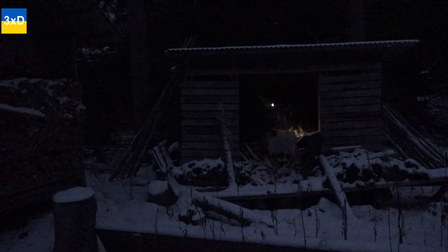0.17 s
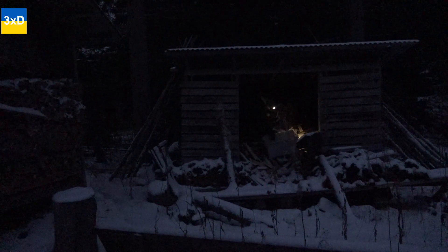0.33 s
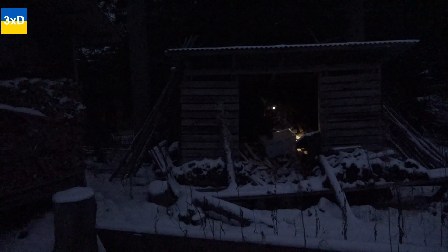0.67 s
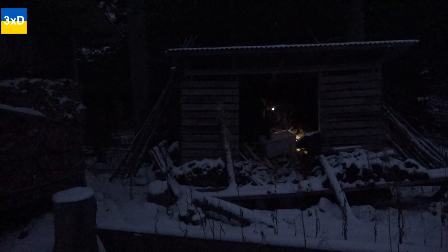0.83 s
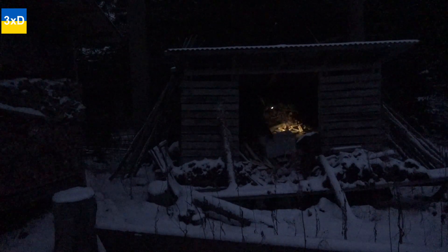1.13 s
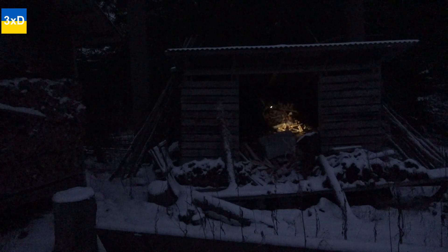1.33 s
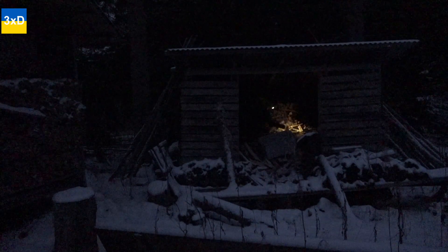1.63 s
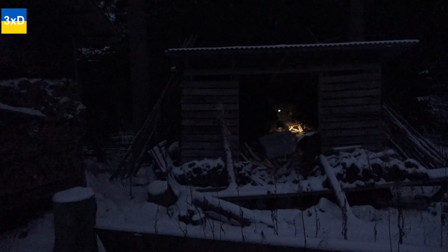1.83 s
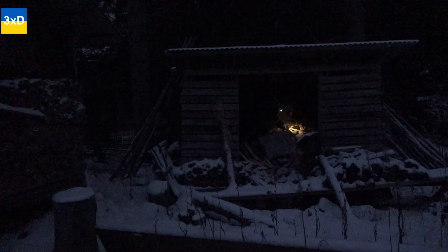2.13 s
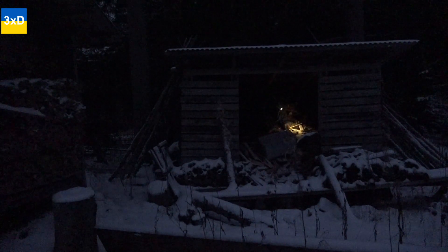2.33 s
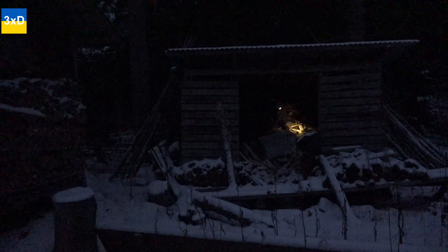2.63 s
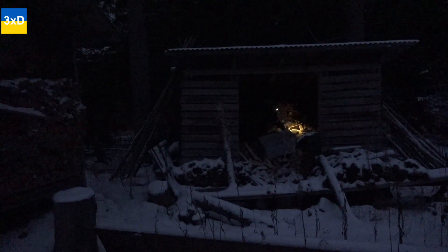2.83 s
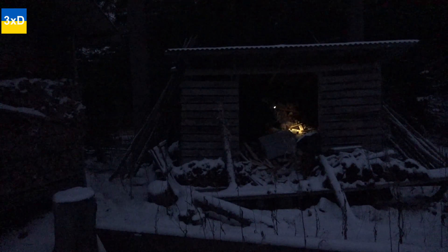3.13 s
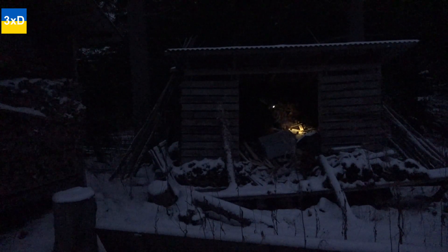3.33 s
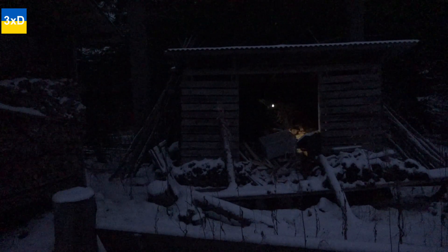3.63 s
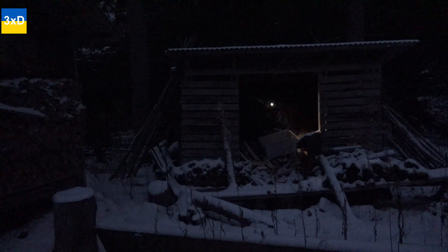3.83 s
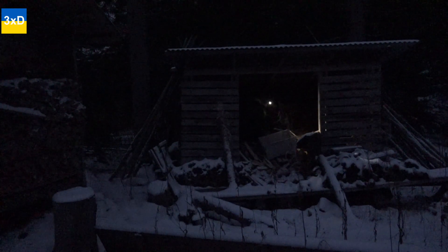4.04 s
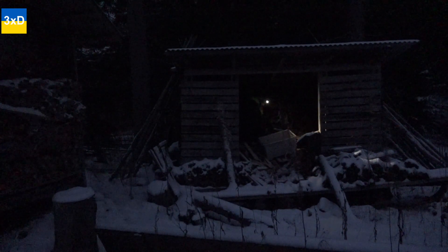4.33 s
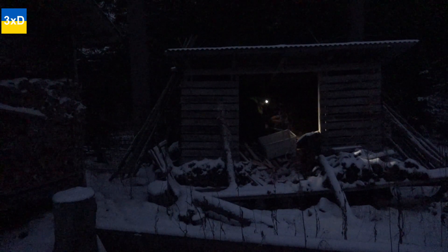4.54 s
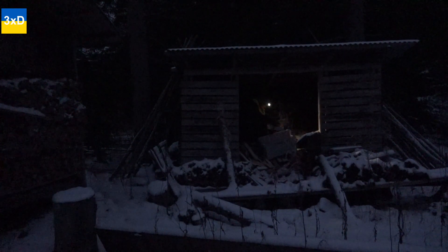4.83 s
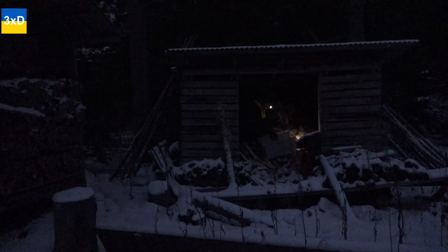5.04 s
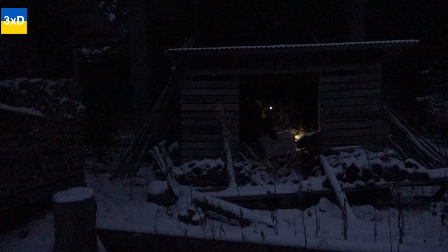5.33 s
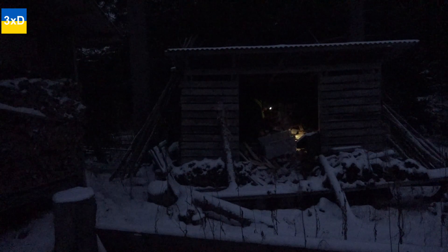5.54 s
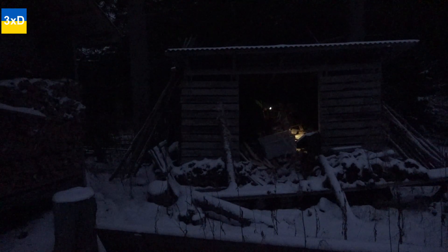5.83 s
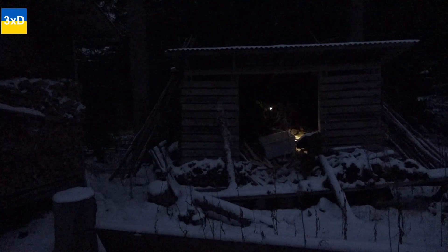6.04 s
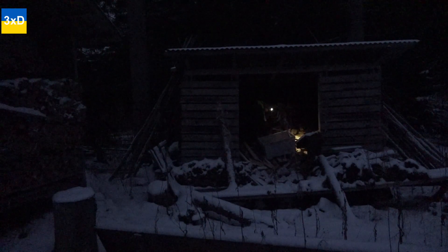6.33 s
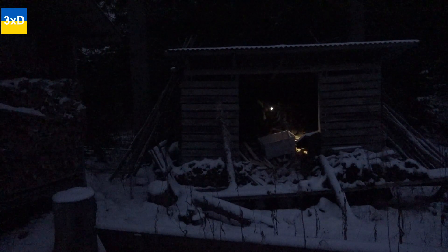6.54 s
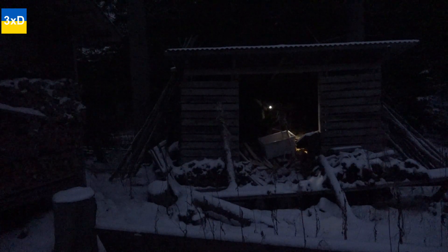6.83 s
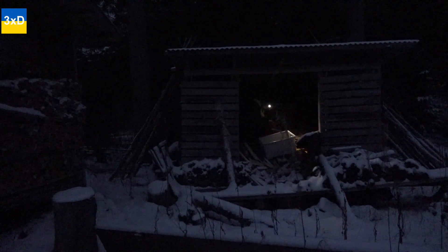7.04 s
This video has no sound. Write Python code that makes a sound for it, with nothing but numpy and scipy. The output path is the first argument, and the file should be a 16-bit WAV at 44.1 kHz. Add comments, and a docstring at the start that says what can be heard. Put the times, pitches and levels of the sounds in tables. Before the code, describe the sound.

Woody knocks tumble in two quick bursts, pause, then one solid knock starts a stretch of rough rubbing, clacking and crackling from a log pile. Two tiny squeaks precede the loudest blow, a hard crashing tumble that slightly overloads the microphone. Quieter shuffling, ticks and a last faint squeak end it. Outdoor shed, short wooden reflections, low air noise, little wind.

```python
"""In an open woodshed on a quiet night, split logs are pulled from a pile, dropped into a barrow and stacked.
Each knock is a sum of damped modes of the log, with bands of noise from pile and boards and a contact crack.
Bark ticks are short noise bursts; drags are grainy noise with small taps; squeaks are rough gliding tones.
Still air is coloured noise. Loud blows turn the gain down, and the loudest peaks are clipped."""
import sys
import numpy as np
from scipy import signal
from scipy.fft import rfft, irfft, next_fast_len
from scipy.io import wavfile
from scipy.ndimage import uniform_filter1d, map_coordinates

SR = 44100
rng = np.random.default_rng(int(sys.argv[2]) if len(sys.argv) > 2 else 0)


def inscribe(sig):
    """Save sig as 16-bit PCM at rate SR to the path in sys.argv[1].

    A 1-D sig is mono; a 2-D sig holds one channel per row.
    Samples are clipped to [-1, 1] before scaling.
    """
    pcm = np.round(np.clip(np.atleast_2d(sig).T, -1, 1) * 32767)
    wavfile.write(sys.argv[1], SR, pcm.astype(np.int16))


N = 316638

# Spectrum of snapping bark. Each row: frequency in Hz, relative level in dB per Hz.
SNAP_SPECTRUM = [(1200, -7.5), (3500, -3), (6000, -6), (11000, -13.5), (16000, -21)]
BODY_GROWS = 0.22  # dB of pile noise, boom and overtones per dB of hardness: a soft contact leaves a purer note


def amp(db):
    """Level: twenty decibels are a factor of ten in amplitude."""
    return 10 ** (np.asarray(db) / 20)


def unit(x):
    """Normalisation: mean power is brought to one, so that rms is 1."""
    return x / np.sqrt(np.mean(x ** 2) + 1e-20)


def along(points, hz):
    """Spectral envelope: straight lines between (Hz, value) points on a logarithmic frequency axis."""
    f, v = np.transpose(points)
    return np.interp(np.log(hz + 1), np.log(f + 1), v)


def filtered(x, response):
    """Linear filtering: the spectrum is multiplied by a response, given as a function of frequency."""
    m = next_fast_len(x.shape[-1] + 8192)
    spectrum = rfft(x, m) * response(np.fft.rfftfreq(m, 1 / SR))
    return irfft(spectrum, m)[..., :x.shape[-1]]


def hiss(spectrum, size=N):
    """Coloured noise: white noise filtered to a spectral envelope, at rms 1."""
    white = rng.standard_normal(size)
    return unit(filtered(white, lambda hz: amp(along(spectrum, hz))))


def wobble(rate):
    """Slow modulation: a smooth curve through random knots, rate knots a second."""
    knots = rng.standard_normal(int(N * rate / SR) + 4)
    return map_coordinates(knots, [np.arange(N) * rate / SR])


def fade(t, t60, attack):
    """Damping: a quick rise, then exponential decay by 60 dB in t60 seconds."""
    return (1 - np.exp(-t / attack)) * amp(-60 * t / t60)


def swell(s, length):
    """Stroke envelope: the level rises and falls once between s and s + length."""
    return np.sin(np.pi * np.clip((np.arange(N) / SR - s) / length, 0, 1)) ** .5


def bump(hz, centre_hz, octaves):
    """Broad resonance: a Gaussian bell on a logarithmic frequency axis."""
    return np.exp(-.5 * (np.log2(hz / centre_hz) / octaves) ** 2)


def shaped(noise, envelope):
    """Energy conservation: noise under an envelope is scaled to the envelope's own energy."""
    x = noise * envelope
    return x * np.linalg.norm(envelope) / np.linalg.norm(x)


def air():
    """Background noise: still air and microphone hiss are broadband; light wind stirs the deepest bass."""
    # Each row: frequency in Hz, relative level in dB per Hz.
    air_spectrum = [(20, 0.5), (120, -3), (680, -6), (1000, -11.5), (3000, -18.5), (16000, -29.5)]
    wind = amp(-66.0 + 3.3 * wobble(26)) * hiss([(30, -27), (90, -12.0), (200, -38.5)])
    still = amp(-53.5 + 0.37 * wobble(9.7)) * hiss(air_spectrum)
    return still + wind


def squeaks():
    """Frequency modulation: brief faint squeaks are tones whose pitch slides and jitters."""
    # Each row: start in seconds, length in seconds, first pitch in Hz, last pitch in Hz, mean level in dB.
    squeak_table = [(4.477, 0.067, 2620, 2700, -49.5), (4.571, 0.048, 2450, 3250, -51.5),
                    (7.062, 0.17, 1730, 1740, -51)]
    t, out = np.arange(N) / SR, 0
    for s, length, from_hz, to_hz, db in squeak_table:
        glide = np.interp(t, [s, s + length], [from_hz, to_hz])
        hz = glide * (1 + 0.063 * wobble(400))
        tone = np.sin(2 * np.pi * np.cumsum(hz) / SR)
        out = out + amp(db + 2.6 * wobble(150)) * swell(s, length) * tone
    return out


def grit(rate, t60, spread_db):
    """Shot-noise envelope: many small random contacts, rate a second, a few larger than the rest."""
    sizes = amp(spread_db * np.minimum(rng.exponential(1, N), 3))
    hits = (rng.random(N) < rate / SR) * sizes
    decays = signal.fftconvolve(hits, fade(np.arange(4096) / SR, t60, 0.0016))[:N]
    return unit(decays + .5)  # the constant keeps some sound between contacts


def patchy(x, patchy_db):
    """Many rubbing contacts: short blotches of random gain in time and pitch."""
    z = signal.stft(x, nperseg=256)[2]
    field = uniform_filter1d(rng.standard_normal(z.shape), size=7, axis=0)  # smooth in pitch
    field = uniform_filter1d(field, size=5, axis=1)  # smooth in time
    return unit(signal.istft(z * amp(patchy_db * unit(field)), nperseg=256)[1][:N])


def chips():
    """Small-body resonance: wood pieces tap, each a note damped by 60 dB in 25 cycles at its own pitch."""
    taps_per_s, middle_hz = 40, 1540
    draw = rng.random((round(taps_per_s * N / SR), 3))
    t = np.arange(SR // 25) / SR
    hz = middle_hz * 2 ** (2.4 * (draw[:, 1:2] - .5))
    size = amp(-5 * np.log(draw[:, 2:] + 0.042))  # a few taps much larger than the rest
    notes = size * fade(t, 25 / hz, 0.00044) * np.sin(2 * np.pi * hz * t)
    at = (draw[:, :1] * N).astype(int) + np.arange(len(t))
    return unit(np.bincount(at.ravel(), notes.ravel())[:N])


def shifting():
    """Sliding friction: dragged logs rumble, scrape, tap and crackle; rolling logs only rumble."""
    # Logs dragged over each other. Each row: start in seconds, length in seconds, scrape level in dB.
    drag_table = [(1.213, 0.087, -55), (1.484, 0.39, -57), (1.854, 0.2, -45.5), (2.04, 0.17, -47.5),
                  (2.6, 0.23, -50.5), (2.813, 0.47, -46), (3.06, 0.14, -49), (3.29, 0.3, -45.5),
                  (3.54, 0.17, -49), (3.656, 0.15, -48.5), (3.925, 0.11, -48.5), (4.023, 0.14, -46),
                  (4.164, 0.11, -44.5), (4.275, 0.35, -51), (4.647, 0.26, -57.5), (4.924, 0.13, -48.5),
                  (5.94, 0.18, -51), (6.098, 0.18, -49.5), (6.556, 0.16, -53.5), (7.042, 0.12, -56)]
    # Logs rolling in the barrow. Each row: start in seconds, length in seconds, rumble level in dB.
    roll_table = [(5.328, 0.45, -50.5)]
    # Lumpy rumble. Each row: frequency in Hz, relative level in dB per Hz.
    rumble_spectrum = [(50, -21.5), (150, 2.5), (500, 13), (1500, -9), (3000, -43)]
    # Bark scrape. Each row: frequency in Hz, relative level in dB per Hz.
    scrape_spectrum = [(600, -9.5), (1600, 1), (5000, -15.5), (16000, -22.5)]
    rumble_db, chip_db, crackle_db = -1.15, -8, -6.5  # against the scrape

    drag = sum(amp(db) * swell(s, length) for s, length, db in drag_table)
    roll = sum(amp(db) * swell(s, length) for s, length, db in roll_table)
    rumble = grit(77, 0.031, spread_db=2.5) * patchy(hiss(rumble_spectrum), patchy_db=2.0)
    scrape = grit(160, 0.0084, spread_db=5.5) * patchy(hiss(scrape_spectrum), patchy_db=2.5)
    taps = np.pad(chips(), (0, N))[:N]
    crackle = grit(70, 0.012, spread_db=5.0) * patchy(hiss(SNAP_SPECTRUM), patchy_db=5.5)
    dragged = scrape + amp(chip_db) * taps + amp(crackle_db) * crackle
    return (amp(rumble_db) * drag + roll) * rumble + drag * dragged


def ticks():
    """Brittle fracture: bark and splinters snap in a click of a few ms, with a weaker wash in the shed."""
    # Each row: time in seconds, level in dB.
    tick_table = [(0.258, -31), (0.408, -40.5), (1.006, -38), (2, -40.5), (2.152, -36), (2.842, -35),
                  (3.146, -33.5), (3.164, -33), (3.306, -32), (3.342, -37.5), (3.611, -34.5), (3.6533, -30),
                  (3.805, -35.5), (3.9156, -38.5), (3.949, -34), (4.113, -37), (4.2319, -20), (4.677, -43),
                  (5.034, -20.5), (5.443, -43.5), (6.1149, -30), (6.305, -40), (6.4523, -41), (6.5154, -38)]
    envelope, t = np.zeros(N + SR), np.arange(SR // 4) / SR
    click = fade(t, .016, .0002)
    wash = amp(-9.5) * fade(t, 0.14, 0.0028)
    for s, db in tick_table:
        envelope[round(s * SR) - 30:][:len(t)] += amp(db) * (click + wash)
    return envelope[:N] * hiss(SNAP_SPECTRUM)


def log_ring(t, hz, hard_db, t60):
    """Modal vibration: a struck log sounds its pitch and inharmonic overtones, echoed by near walls."""
    # Higher modes of a split log. Each row: mean ratio to the pitch, mean level in dB at hardness 0.
    overtone_table = [(1.598, -9.5), (2.599, -13.5), (3.9, -17.5)]
    ring = fade(t, 0.44 * t60, 0.00045) * np.sin(2 * np.pi * hz * t)
    for times, mode_db in overtone_table:
        mode_hz = hz * times * (1 + 0.12 * rng.normal())
        gain = amp(mode_db + BODY_GROWS * hard_db + rng.normal(0, 2.4))
        decay = fade(t, 0.82 * t60 / times, 0.00065)
        ring = ring + gain * decay * np.sin(2 * np.pi * mode_hz * t)
    walls = np.zeros(1024)  # near shed walls answer within 23 ms
    walls[rng.integers(40, 1024, size=6)] = rng.normal(0, 0.14, size=6)
    walls[0] = 1
    return signal.fftconvolve(ring, walls)[:len(t)]


def shaken_wood(t, chatter, hz, hard_db, t60, boom_db, clack_db):
    """Forced vibration: a blow shakes pile and boards in broad bands round the pitch, the boom and the clack."""
    foot_hz = 750  # logs that ring above this also shake a narrower band
    clack_grows, clack_fades_db = 0.64, 12.5  # dB per dB of hardness; dB lost per octave above the foot
    clack_db += clack_grows * hard_db - clack_fades_db * max(np.log2(hz / foot_hz), 0)
    knots = np.geomspace(60, 6000, 90)
    lumps = np.transpose([knots, rng.normal(0, 5.5, len(knots))])  # each blow has its own peaks and dips

    def band(centre_hz, octaves):
        """Resonant band: noise under a bell with this blow's peaks and dips."""
        white = rng.standard_normal(len(t))
        return unit(filtered(white, lambda f: bump(f + 1, centre_hz, octaves) * amp(along(lumps, f))))

    body = shaped(chatter * band(hz, 0.69 * min(foot_hz / hz, 1)), fade(t, 1.08 * t60, 0.0013))
    boom = shaped(chatter * band(219, 0.99), fade(t, 1.9 * t60, 0.0054))
    clack = shaped(chatter * band(1303, 0.78), fade(t, 1.12 * t60, 0.0012))
    grown_db = BODY_GROWS * hard_db
    return amp(-7.5 + grown_db) * body + amp(boom_db + grown_db) * boom + amp(clack_db) * clack


def contact_crack(t, t60):
    """Impact noise: the brief contact excites a bright band, with a weaker tail."""
    # Each row: frequency in Hz, relative level in dB per Hz.
    crack_spectrum = [(2000, -5), (3500, 0), (9000, -9), (16000, -23)]
    envelope = fade(t, 0.016, 0.0001) + amp(-5.0) * fade(t, 1.33 * t60, 0.00074)
    return hiss(crack_spectrum, size=len(t)) * envelope


def knocks():
    """Impact excitation: each blow rings a log, shakes the wood round it and cracks at the contact."""
    # Each row: time in seconds, level in dB, log pitch in Hz, contact hardness in dB,
    # nominal 60 dB decay time in seconds, from which each part takes its own.
    drop_table = [(0.144, -14.5, 628, -0.5, 0.22), (0.154, -5, 456.4, -2, 0.24),
                  (0.1543, -20.5, 3270, -10, 0.056), (0.195, -15, 504, 3, 0.28),
                  (0.211, -10.5, 400, -2.5, 0.19), (0.277, -7.5, 690, -0.5, 0.09),
                  (0.316, -21.5, 420, 2, 0.28), (0.607, -25, 399, -4, 0.17), (0.7, -23, 856, -34, 0.26),
                  (0.714, -24, 887, 11.5, 0.17), (0.773, -12, 379, -2, 0.17), (0.87, -25, 540, 5, 0.045),
                  (0.876, -11, 532, 8.5, 0.16), (0.921, -7, 324, -8, 0.067), (0.947, -16.5, 470, -19, 0.28),
                  (0.971, -17, 453, 2.5, 0.22), (1.004, -18.5, 321, -23, 0.27), (1.064, -22, 412, 0, 0.03),
                  (4.997, -24, 660, 5, 0.04), (5.016, -3.5, 380, 1.5, 0.49), (5.051, 13.5, 558, 9, 0.051),
                  (5.061, 6, 494, 5.5, 0.11), (5.133, -5.5, 602, -16, 0.07), (5.153, -2, 306, 8.5, 0.095),
                  (5.197, -15, 559, 1, 0.45), (5.274, -9.5, 647, 3.5, 0.11), (5.293, -8.5, 501.6, 2, 0.083),
                  (5.305, -8, 400, -13, 0.12), (5.59, -24, 540, 15.5, 0.14), (5.683, -22.5, 1160, 5, 0.044),
                  (5.699, -22, 420, -4, 0.18)]  # logs landing and tumbling in the barrow
    stack_table = [(2.31, -29.5, 487, -6.5, 0.1), (2.397, -12, 617, -13, 0.13),
                   (2.4, -13.5, 1043, -11, 0.13), (2.689, -37.5, 564, 12.5, 0.12),
                   (2.734, -36.5, 1700, -4, 0.13), (2.932, -21, 564, -3.5, 0.097),
                   (2.952, -22, 580, -10, 0.09), (3.107, -25.5, 860, 5, 0.088),
                   (3.125, -24.5, 667, -4, 0.16), (3.173, -28, 450, -11, 0.12),
                   (3.479, -20, 1665, 6.5, 0.1), (3.514, -21, 577, -13, 0.13),
                   (3.535, -22, 1510, -23, 0.073), (3.617, -28.5, 1275, -1, 0.28),
                   (3.641, -20, 525, -6, 0.072), (3.699, -29, 456, -13, 0.39),
                   (3.724, -24.5, 470, -4, 0.061), (3.849, -28, 1330, 8.5, 0.12),
                   (4.001, -24, 1860, 20, 0.1), (4.212, -19, 1583, 0, 0.16), (4.234, -21, 1373, -17, 0.1),
                   (4.071, -28.5, 1950, -3, 0.051), (4.264, -23, 1030, -22, 0.07),
                   (4.317, -16, 577, -10, 0.074), (4.699, -39.5, 3250, 13.5, 0.12),
                   (6.215, -30.5, 680, -10, 0.11), (6.37, -28.5, 2460, -2, 0.095),
                   (6.372, -33, 710, -2, 0.087), (6.554, -35.5, 376, -15, 0.2),
                   (6.598, -27, 1104, 1.5, 0.14), (6.606, -30.5, 3170, -6, 0.096),
                   (6.63, -33, 910, -3, 0.055), (6.825, -36, 620, -3, 0.046)]  # log on log at the pile
    # Balance of a contact of hardness 0: boom in dB, clack in dB before its fall with pitch, crack in dB.
    barrow_balance = (-11.5, -19, -31)
    pile_balance = (-19, -7, -16.5)

    out, t = np.zeros(N + SR), np.arange(SR // 2) / SR
    # logs chatter against each other as they settle
    rattle = np.pad(amp(2.4 * wobble(70)), (0, SR), constant_values=1)
    blows = [(*row, *barrow_balance) for row in drop_table]
    blows += [(*row, *pile_balance) for row in stack_table]
    for s, db, hz, hard_db, t60, boom_db, clack_db, crack_db in blows:
        start = round(s * SR)
        ring = log_ring(t, hz, hard_db, t60)
        shaken = shaken_wood(t, rattle[start:][:len(t)], hz, hard_db, t60, boom_db, clack_db)
        crack = amp(crack_db + hard_db) * contact_crack(t, t60)
        out[start:][:len(t)] += amp(db) * (amp(-3.5) * ring + shaken + crack)
    return out[:N]


def scene():
    """Superposition: the pressures of all sources add at one microphone."""
    return (air() + squeaks() + shifting() + ticks() + knocks())[None]


def record(dry):
    """Compression and saturation: gain drops on loud blows and creeps back, peaks clip, the top is cut."""
    level_db = 10 * np.log10(np.abs(uniform_filter1d(dry ** 2, 2048)) + 1e-12)
    creep_db = 4.04 * np.arange(N) / SR  # recovery of 4.04 dB a second
    over_db = np.maximum(0.39 * (level_db + 15.0), 0)  # 0.39 dB of gain lost per dB above -15 dB
    turned_db = np.maximum(np.maximum.accumulate(over_db + creep_db, axis=1) - creep_db, 0)
    x = dry * amp(-uniform_filter1d(turned_db, 1024))
    x = x / (1 + np.abs(x) ** 8) ** (1 / 8)  # rounded clipping at full scale
    top_hz = 15900
    return filtered(x, lambda hz: 1 / (1 + (hz / top_hz) ** 90))


dry = scene()
out = record(dry)
inscribe(out)
```